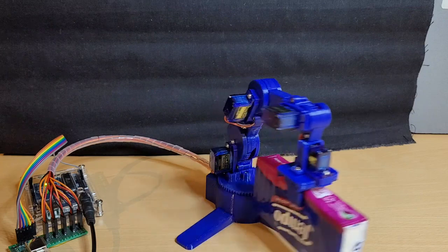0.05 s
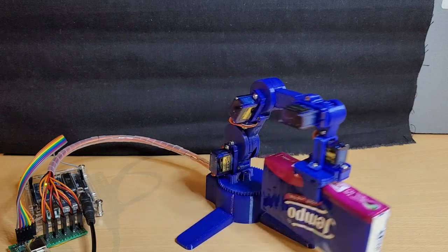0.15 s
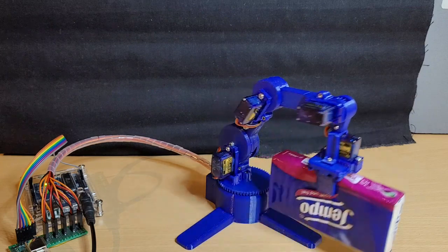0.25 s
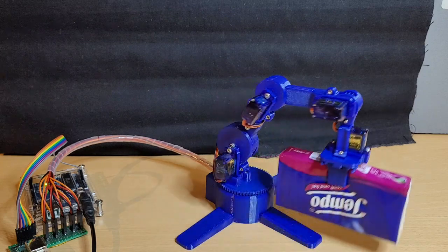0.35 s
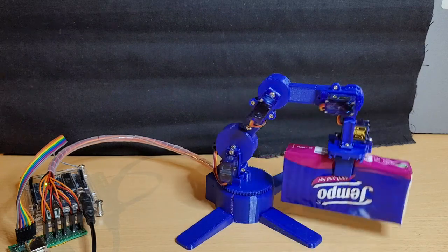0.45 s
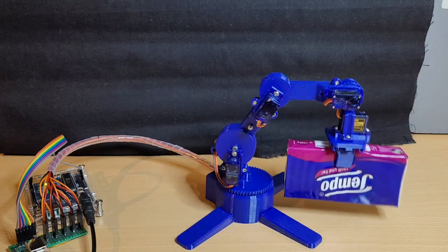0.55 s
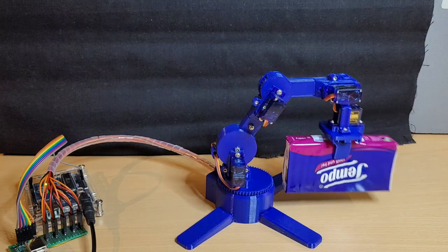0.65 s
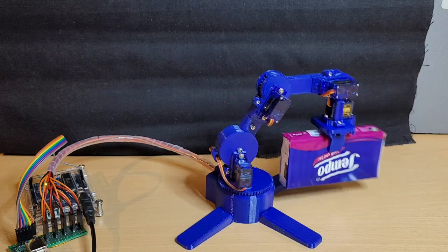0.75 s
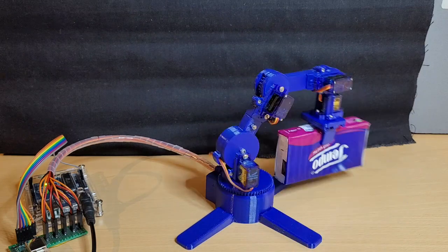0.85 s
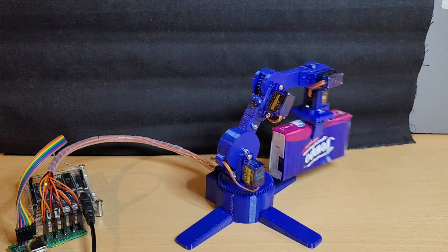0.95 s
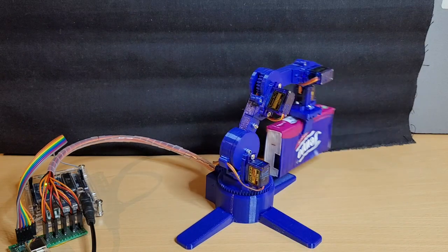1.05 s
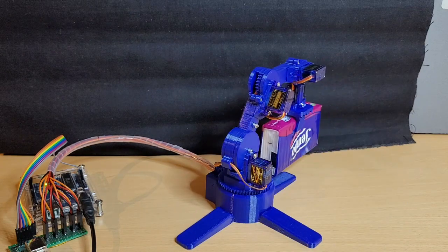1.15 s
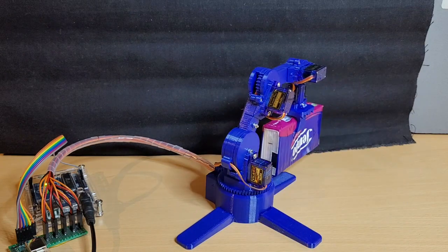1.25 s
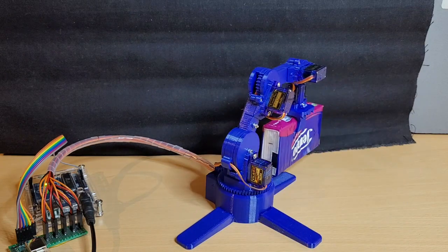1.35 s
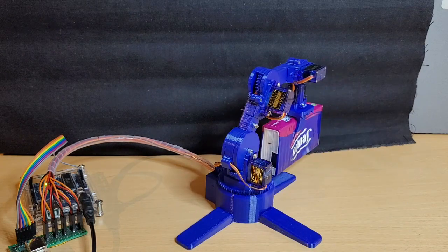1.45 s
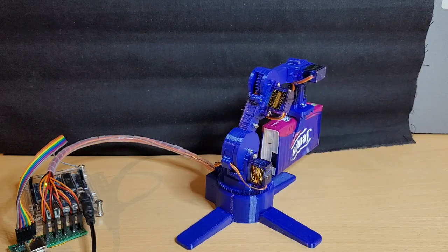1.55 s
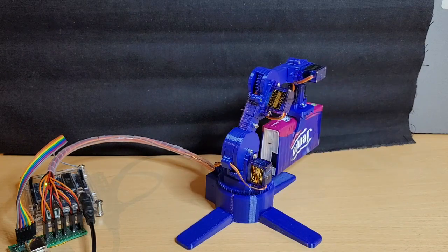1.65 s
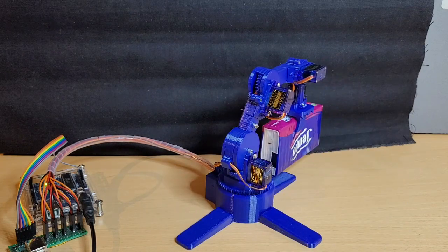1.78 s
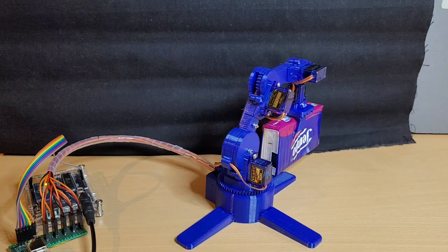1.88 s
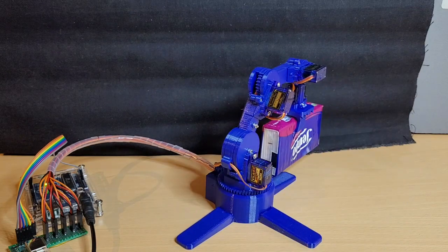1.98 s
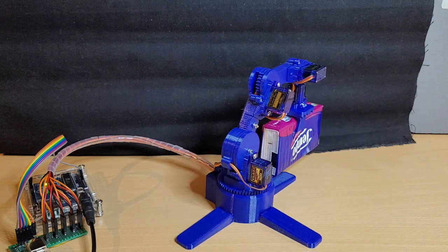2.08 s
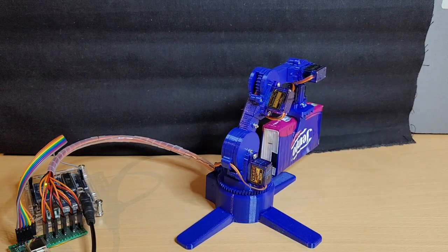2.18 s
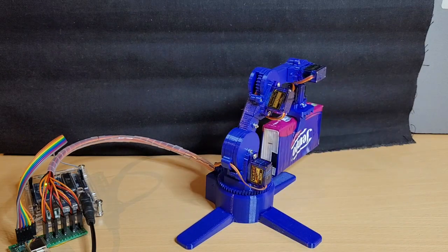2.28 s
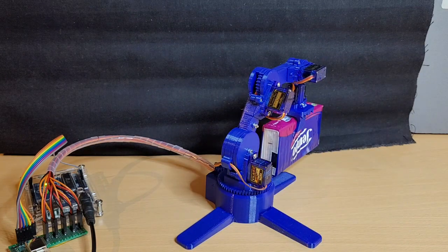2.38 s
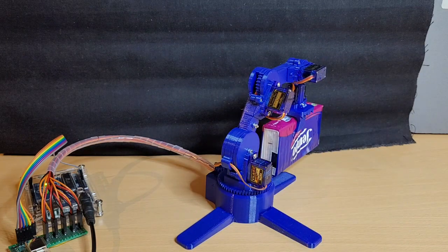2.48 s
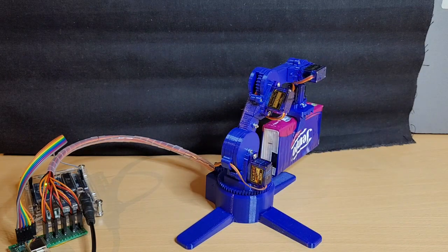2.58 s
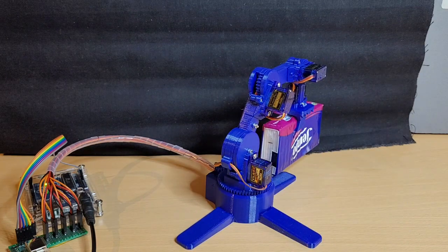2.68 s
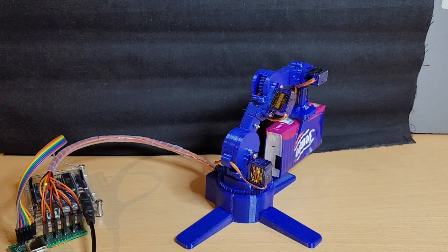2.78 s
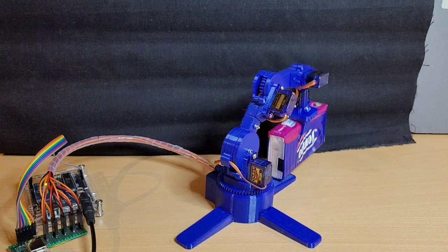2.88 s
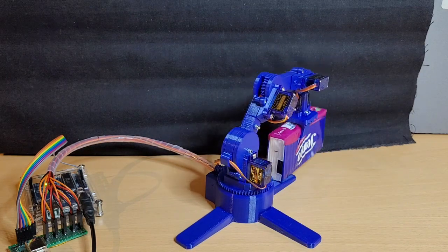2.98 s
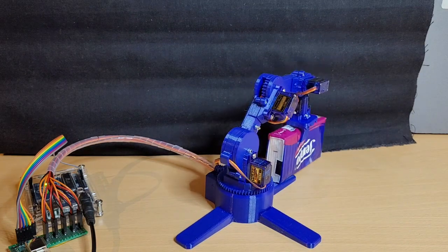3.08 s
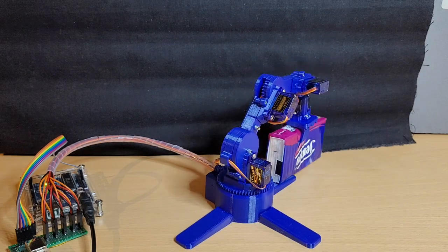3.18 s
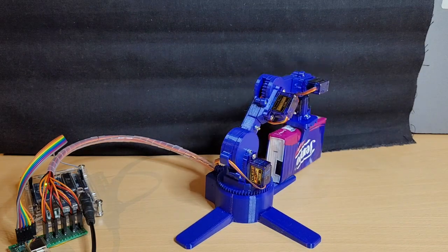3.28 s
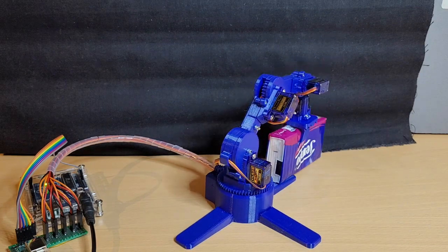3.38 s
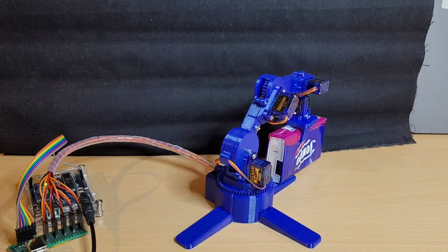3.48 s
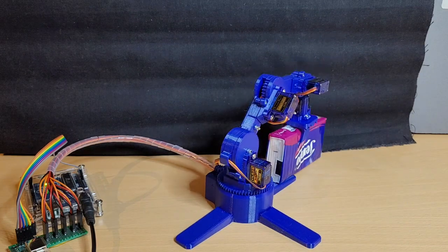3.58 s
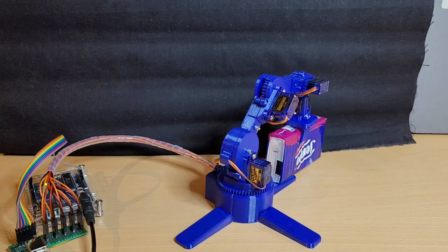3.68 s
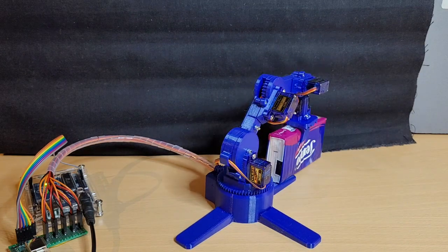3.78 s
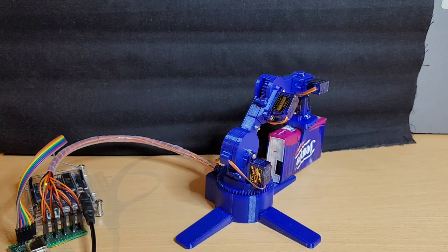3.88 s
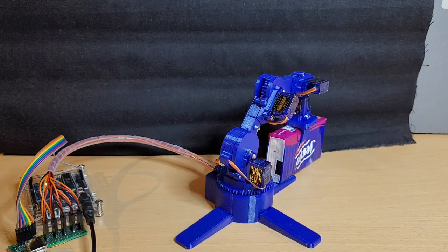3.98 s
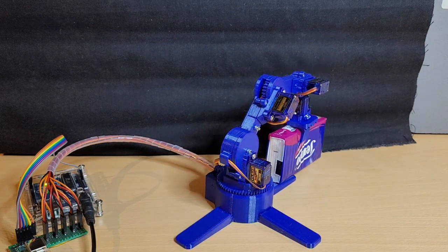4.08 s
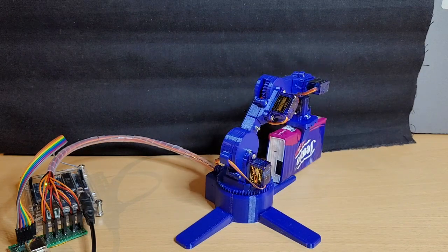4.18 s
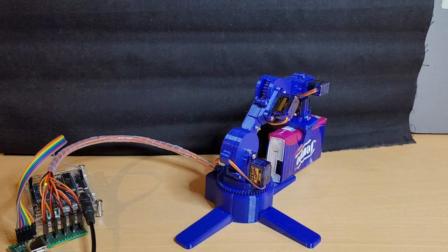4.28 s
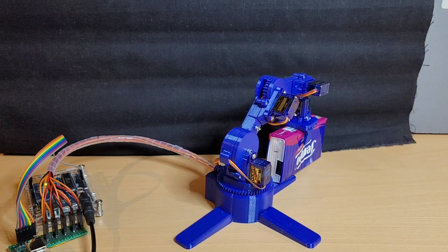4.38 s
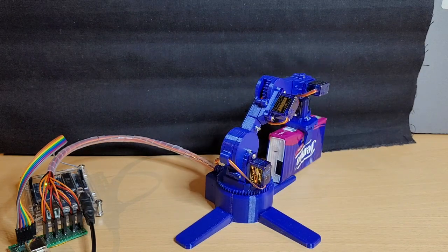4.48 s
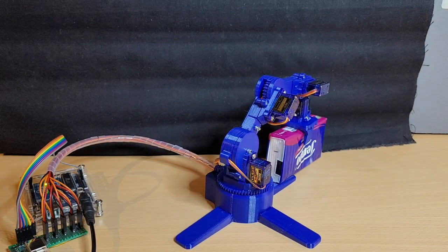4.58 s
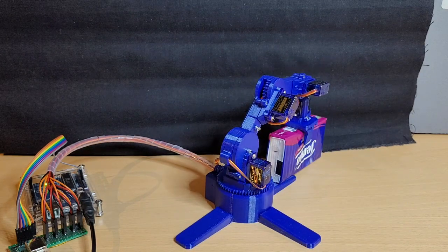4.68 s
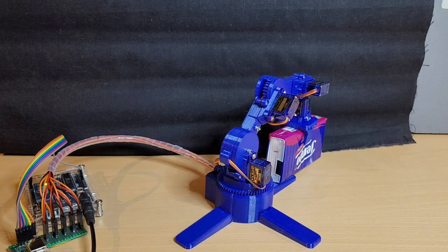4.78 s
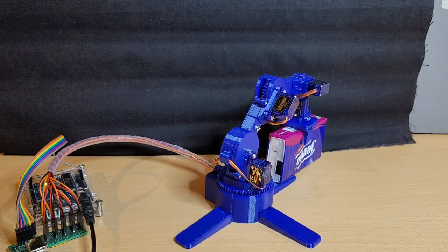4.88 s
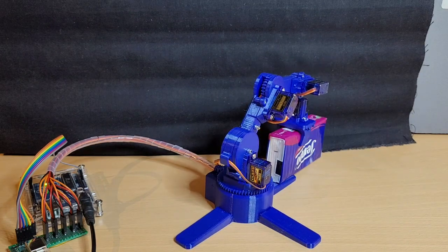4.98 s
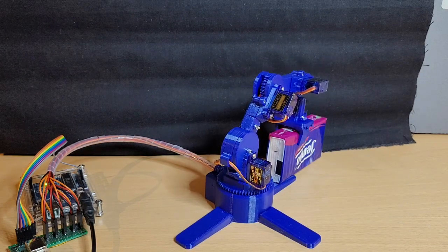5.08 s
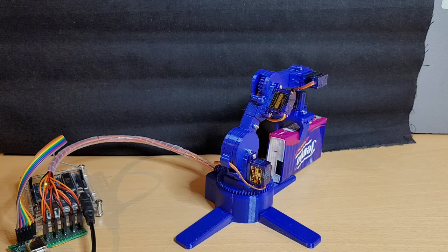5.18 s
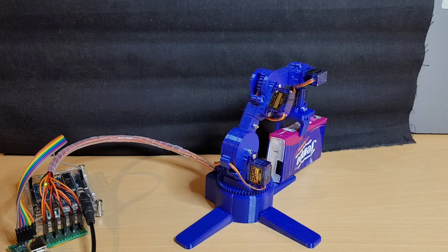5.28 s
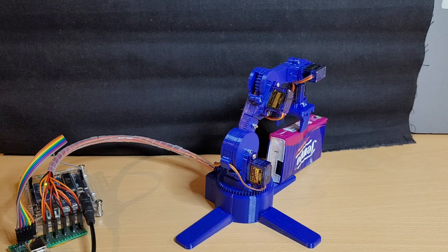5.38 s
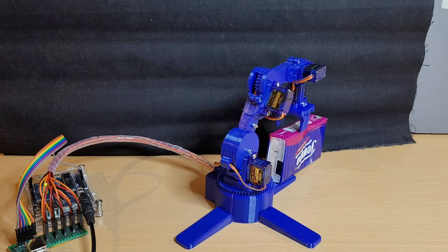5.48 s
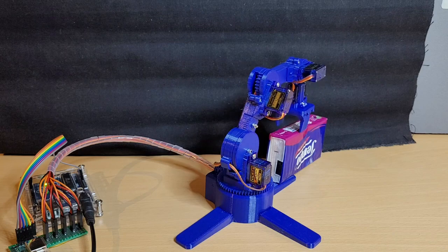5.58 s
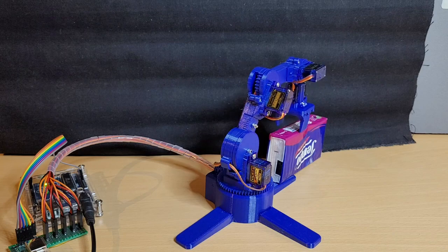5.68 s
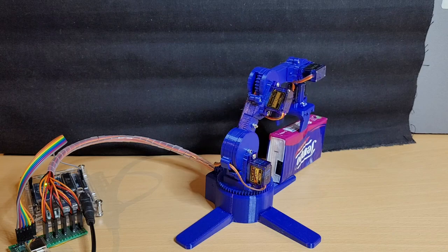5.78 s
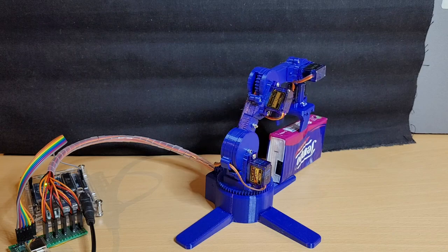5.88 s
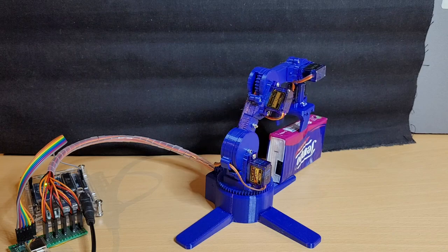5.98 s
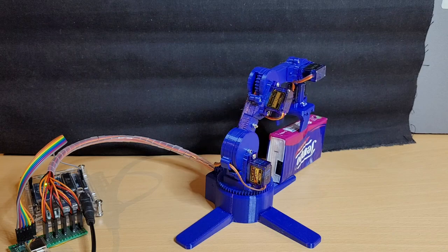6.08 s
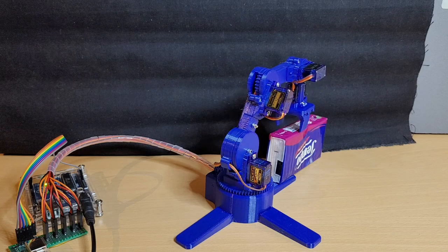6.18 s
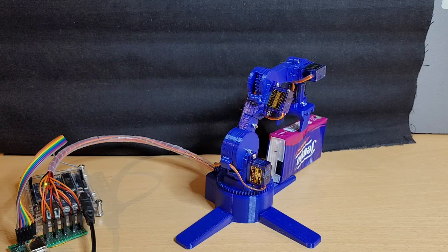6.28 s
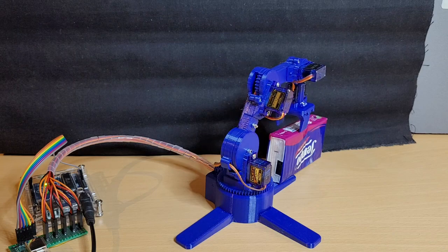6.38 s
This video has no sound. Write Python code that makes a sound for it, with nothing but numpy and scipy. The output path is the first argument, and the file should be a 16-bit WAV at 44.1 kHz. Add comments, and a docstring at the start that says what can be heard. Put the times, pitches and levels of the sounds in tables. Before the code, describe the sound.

A small plastic robot arm on a wooden table, heard very close. A servo whirrs with a nasal whine and broad, raspy gear rattle for just over a second, dropping in pitch as it stops. Then quiet hiss and a fast, regular ticking buzz as motors hold position, broken by short gritty gear twitches near three, four and five seconds. Small dry room, low table hum.

```python
"""A small plastic robot arm on a table: first the base servo finishes a long swing, whining and rattling its gears.
As it stops, switching edges start to knock and tick once per 20 ms control frame, while loaded motors hiss.
Joints then twitch in short surges of gear noise, mostly near 3, 4.2 and 5 s, and the carried load bumps softly.
Throughout, filtered noise and a low tone make the table top hum, over noise-tail reflections and quiet room tone;
a two-port microphone hears it close up."""
import sys
import numpy as np
from scipy import signal
from scipy.fft import rfft, irfft, next_fast_len
from scipy.io import wavfile
from scipy.ndimage import uniform_filter1d, map_coordinates

SR = 44100
rng = np.random.default_rng(int(sys.argv[2]) if len(sys.argv) > 2 else 0)


def pcm_store(signal):
    """Save signal as 16-bit PCM."""
    levels = np.round(np.clip(np.atleast_2d(signal), -1, 1) * 32767)
    wavfile.write(sys.argv[1], SR, levels.astype(np.int16).T)


N = 284445
FRAME_S = 1 / 50  # control frame of the servos

# room tone, spectrum: (f/Hz, gain/dB)
AIR_SPECTRUM = [(12, -69), (20, -34), (53, 8.5), (189, -27), (350, -11), (381, 1), (795, -11.5),
                (1030, -23.5), (1200, -14), (1560, -52), (2640, -120)]
AIR_DB = -88.5 + 3.0  # level of the quiet room tone, both parts together
# early reflections against direct sound: (f/Hz, level/dB)
REFLECTED = [(100, -15), (300, -7), (600, -7), (1100, -11), (2000, -11), (4000, -9)]
# microphone port colour: (f/Hz, left minus right/dB)
PORT_COLOUR = [(60, -1), (99, -5), (160, 1), (270, -3), (450, 0.5), (740, -3), (1220, 1.5), (2010, 0),
               (3330, 0.0), (5500, -2.0), (9080, 0.5), (15000, 4.5)]
TOP_HZ = 15830  # band limit of the microphone
# broad gear noise at the two ports: (f/Hz, likeness 0 to 1)
PORT_LIKENESS = [(60, 1), (300, 0.67), (640, 1), (1400, 0.53), (3100, 0.47), (6000, 0.2), (15000, 0.13)]

# pushes on the table top: (t/s, ring level/dB, rumble level/dB, deep shake level/dB, t60/s)
TABLE_PUSHES = [(.05, -61, -67, -70, 0.36), (.14, -57.5, -65, -68, 0.72), (.3, -59.5, -77, -67, 0.41),
                (.45, -65, -69, -61, .2), (.55, -54, -73, -72, 0.52), (.66, -55.5, -69, -69, 0.35),
                (.86, -59, -62, -82, 0.1), (1.03, -58.5, -78, -79, 0.22), (1.12, -55.5, -67, -63, 0.32),
                (1.26, -80, -93, -98, 1.1), (2.67, -86, -84, -79, 0.28), (2.76, -70, -78.5, -81, 1.5),
                (2.99, -73, -78, -70, 0.26), (3.08, -78, -79, -78, 0.12), (3.21, -84, -115, -101, 0.25),
                (4.27, -86, -67, -81, 0.16), (4.38, -75, -91, -97, 0.49), (4.895, -57, -72, -69, .2),
                (4.925, -60.5, -63, -70, 0.24), (5.16, -65.5, -64, -66, 0.56), (5.27, -67, -84, -82, 0.37),
                (5.35, -60.5, -70, -89, 0.32)]
PUSH_RISE_S = .03
SWING_RUMBLE_DB, SWING_SHAKE_DB = -64, -86
REST_RING_DB, REST_RUMBLE_DB, REST_SHAKE_DB = -93, -83, -89
# table rumble and the deep shake below it, spectra: (f/Hz, gain/dB)
RUMBLE_SPECTRUM = [(120, -30), (150, -5), (250, -0.5), (340, -1.5), (450, -12.5), (700, -12.5), (900, -38)]
SHAKE_SPECTRUM = [(15, -28), (30, -18), (60, -7.5), (95, -4), (125, -8), (170, -38)]

# hiss of the loaded motors, first level held from the start: (t/s, level/dB)
STRAIN_LEVEL = [(1.1, -46), (1.17, -60.5), (1.38, -65), (1.84, -63), (2.45, -65), (3.1, -59), (3.18, -67),
                (3.45, -69), (4.15, -64), (4.8, -69), (5.3, -56.5), (5.48, -65), (6.45, -62.5)]
# its spectrum: (f/Hz, gain/dB)
HISS_SPECTRUM = [(530, -41), (900, -29), (1010, -11.5), (1170, -4.5), (1390, -13.5), (1850, -7.5),
                 (2010, -4.5), (2380, -13.5), (3670, -6), (4190, -12), (6470, -8), (8420, -15.5),
                 (9270, -18.5), (11500, -14.5), (15900, -27.5)]

# bumps of the load in the grip: (t/s, level/dB)
LOAD_BUMPS = [(4.197, -42), (4.235, -56), (4.257, -59), (4.276, -43), (4.3, -51), (5.19, -50)]
# dull modes of the load: (f/Hz, width/Hz, level/dB)
LOAD_MODES = [(330, 180, -4), (624, 300, -2)]

# switching edges, one list per servo:
# (from t/s, to t/s, place in frame/ms, scatter/ms, strength level/dB, extra deep knock level/dB)
SERVO_EDGES = [
    [(1.2, 1.64, 2.05, .34, -41.5, -4), (1.64, 1.73, 2.36, .36, -34.5, -8),
     (1.73, 3.207, 4.1, .59, -54, -24), (3.25, 3.45, 2.39, .03, -49, 8),
     (3.45, 4.19, 2.42, .014, -42.5, 9.5), (4.199, 4.797, 2.87, .018, -41, -4.5),
     (4.797, 6.45, 2.98, .047, -40, 0)],
    [(1.624, 1.724, 9.1, .34, -33, -14), (1.724, 2.15, 7.9, .09, -37, -2),
     (2.15, 3.197, 6.84, .057, -40, 6)],
    [(1.29, 1.622, 10.5, .07, -51, 5), (3.197, 3.4, 10.4, .035, -48.5, 4), (3.4, 4.21, 10.4, .02, -44, -17),
     (4.21, 6.45, 11.14, .03, -42.5, -12)],
    [(3.204, 4.15, 6.26, .03, -55, -1), (4.35, 6.45, 10, .011, -41.5, -15),
     (5.813, 6.45, 18.2, .03, -45, -37)],
]
# voice of each servo: (level/dB of four housing parts, tick level/dB)
SERVO_VOICES = [(-10.5, -4, -2.5, -3, -16.5), (-19.5, -7, -0.5, -4.5, -18.5), (-10, -1, 1, -4.5, -22.5),
                (8, -19, -31, -5, -14)]
# each servo's edge comes early and late in turn, by: (offset/ms)
EDGE_DITHER = [0.018, .12, 0.013, 0.018]
# how far the extra deep knock reaches each housing part: (share of its dB)
DEEP_SHARE = [1, .4, 0.3, 0]
# modes of four housing parts: (f/Hz, width/Hz, level/dB)
HOUSING_MODES = [
    [(945, 35, -12.5), (670, 21, -22), (1061, 21.5, 3.5)],
    [(1143, 60, 0), (1199, 65, 2)],
    [(2025, 85, -11)],
    [(2655, 700, -3.5), (3260, 93, 3.5), (3500, 84, -2.5), (3737, 65, 6)],
]
# gear modes, a dull and a bright list: (f/Hz, width/Hz, level/dB)
GEAR_MODES = [
    [(3646, 1740, 0.5), (4700, 1850, 3.5), (6410, 770, 6.5), (8490, 460, -1.5)],
    [(9800, 100, -2), (11470, 370, -3.5), (13300, 490, -1.5), (13200, 9300, -21)],
]

# short joint moves, a surge per frame: (first surge t/s, frames to the snapped surge, frames to the last)
JOINT_MOVES = [(1.1144, 0, 0), (2.322, 0, 0), (2.6424, 1, 3), (2.7207, 0, 2), (2.781, 1, 2), (2.841, 1, 2),
               (2.901, 0, 1), (2.943, 2, 3), (3.021, 0, 1), (3.059, 2, 3), (4.19, 1, 1), (4.229, 0, 0),
               (4.245, 1, 1), (4.278, 0, 2), (4.8, 3, 8), (5.059, 1, 3), (5.14, 2, 5), (5.305, 1, 2)]
# their force: (first level/dB, level of the snapped surge/dB, last level/dB, brightness/dB, arm shudder level/dB)
MOVE_FORCE = [(-50, -46, -50, -10, -90), (-62, -60, -62, -8, -90), (-44.5, -47, -45.5, -4, -65),
              (-38, -39, -76, -8, -60), (-58, -59, -54.5, 2, -82), (-48, -49.5, -56, 0.5, -70),
              (-52, -49.5, -68, 4.5, -76), (-46.5, -51, -68, 1, -75), (-58, -56, -57, -1, -71),
              (-48, -53, -53, 2.5, -73), (-64, -59.5, -64, -1, -66), (-54, -53.5, -54, -4, -61),
              (-62, -57, -60, -3, -69), (-51, -53, -63, -6, -58.5), (-51, -38.5, -51, 1.5, -55.5),
              (-43.5, -38, -46, -1, -55), (-52, -47, -55, -4, -71), (-45, -41.5, -47.5, -4.5, -57.5)]
SURGE_RISE_S, SURGE_S = 0.0037, 0.016
COAST_S, COAST_DB = 0.022, -12.5  # the gears run on after a surge
SNAP_S, SNAP_DB = 0.0021, 1.5  # slack is taken up with a snap at one chosen surge of each move
DULLING_DB = 1  # treble lost per frame of a move
# shudder of the arm, spectrum: (f/Hz, gain/dB)
SHUDDER_SPECTRUM = [(250, -41), (350, -7), (700, -8), (1150, 10), (1450, 2), (1750, 9.5), (2100, 8),
                    (2600, -54), (3500, -57)]

# gear teeth in the long swing: (t/s, level/dB)
SWING_TEETH = [(0, -42.5), (.16, -40), (.26, -46), (.37, -46.5), (.48, -43), (.58, -40), (.68, -41),
               (.8, -45), (1.09, -43), (1.126, -33.5), (1.166, -63), (1.23, -77)]
HOUSING_DB = -48.5  # mean level of the housing rattle
# housing rattle and tooth rattle, spectra: (f/Hz, gain/dB)
HOUSING_SPECTRUM = [(290, -21.5), (500, -4.5), (567, -15), (619, -13), (736, -18), (816, -13.5), (876, -6),
                    (986, -12.5), (1160, -6), (1450, -7.5), (2050, 2.5), (2460, -10), (3300, -22),
                    (4290, -58), (7260, -120)]
TEETH_SPECTRUM = [(1470, -22.5), (2500, -2), (4100, -20), (4460, -11), (5390, 2.5), (6370, -0.5), (7420, 3),
                  (8970, -4.5), (9390, -1), (10500, -4), (11500, 1), (13300, -5), (15400, -7.5)]
WHISTLE_S, WHISTLE_WIDE_S, WHISTLE_DB = 0.59, 0.28, -51  # the pinion whistle swells and fades
STOP_S, STOP_FADE_S = 1.127, .01  # the swing ends

# swinging motor: (t/s, shaft f/Hz, shaft tone level/dB)
MOTOR_SHAFT = [(0, 413.8, -50.5), (.146, 413, -49), (.23, 416.6, -59), (.28, 462.4, -60),
               (.374, 461.4, -49.5), (.53, 458.6, -48.5), (.62, 451.5, -59.5), (.71, 435.3, -63),
               (.77, 439.8, -56), (.88, 448.2, -56.5), (.92, 405.6, -53.5), (1.04, 338.2, -49.5),
               (1.08, 309, -56), (1.115, 282, -61), (1.18, 272, -70)]
# its 2nd, 3rd and 5th order, before the case: (level/dB)
ORDER_LEVELS = [-66, -61.5, -56.5]
# what the case lets out of the orders: (f/Hz, gain/dB)
CASE_GAIN = [(500, -18), (850, -6.5), (1000, 2), (1150, 14), (1250, 5.5), (1385, 3.5), (1440, -14),
             (1800, 3), (2070, 4), (2230, 6.5), (2320, -3)]
FLARE_S, FLARE_WIDE_S, FLARE_DB = .85, .045, 25  # the 2nd order flares once before the motor slows


def amp(db):
    """Decibels to amplitude."""
    return 10 ** (np.asarray(db) / 20)


def unit(x):
    """x at rms 1."""
    return x / np.sqrt(np.mean(x ** 2) + 1e-20)


def along(points, hz):
    """(f/Hz, value) points read on a log frequency axis."""
    f, v = np.transpose(points)
    return np.interp(np.log(hz + 1), np.log(f + 1), v)


def curves(rows):
    """One value per sample for each column after the time."""
    s, *cols = np.transpose(rows)
    return [np.interp(np.arange(N) / SR, s, c) for c in cols]


def during(rows):
    """1 inside the time span of a table, 0 outside, with soft edges."""
    t = np.arange(N) / SR
    return uniform_filter1d(1. * (t >= rows[0][0]) * (t <= rows[-1][0]), size=400)


def bump(at, wide):
    """A bell-shaped swell of height 1."""
    return np.exp(-.5 * ((np.arange(N) / SR - at) / wide) ** 2)


def running():
    """1 while the swing lasts, fading as it stops."""
    return 1 / (1 + np.exp(np.clip((np.arange(N) / SR - STOP_S) / STOP_FADE_S, -50, 50)))


def wobble(rate):
    """A smooth random curve, rate knots a second."""
    knots = rng.standard_normal(int(N * rate / SR) + 4)
    return map_coordinates(knots, [np.arange(N) * rate / SR])


def filtered(x, response):
    """x through a complex response of frequency."""
    m = next_fast_len(N + SR // 2)
    return irfft(rfft(x, m) * response(np.fft.rfftfreq(m, 1 / SR)), m)[..., :N]


def coloured(x, spectrum):
    """x shaped by a (f/Hz, gain/dB) spectrum, rms 1."""
    return unit(filtered(x, lambda hz: amp(along(spectrum, hz))))


def rung(x, modes):
    """x through causal resonances of alternating sign; white noise keeps its level."""
    def shape(f):
        total = 0
        for k, (centre, width, db) in enumerate(modes):
            damping = 1j * f * width
            total = total + (-1) ** k * amp(db) * damping / (centre ** 2 - f * f + damping)
        return total
    size = np.sqrt(np.mean(np.abs(shape(np.linspace(1, SR / 2, num=4000))) ** 2))
    return filtered(x, shape) / size


def band(x, hz, width_hz):
    """A narrow band made from x, carried along a moving centre."""
    slow = filtered(x, lambda f: 1 / (1 + 1j * f / width_hz) ** 2)
    return unit(slow * np.sin(2 * np.pi * np.cumsum(hz + np.zeros(N)) / SR))


def spread(rows, patchy_db=2.5):
    """Noise from a source larger than the port spacing, less alike in the treble; its colour drifts in patches."""
    shared, own = rng.standard_normal(rows), rng.standard_normal((2, rows))
    alike = np.clip(along(PORT_LIKENESS, np.fft.rfftfreq(rows, 1 / SR)), 0, 1)
    noise = irfft(np.sqrt(alike) * rfft(shared) + np.sqrt(1 - alike) * rfft(own), rows)
    z = signal.stft(noise, nperseg=512)[2]
    field = uniform_filter1d(rng.standard_normal(z.shape[1:]), size=4, axis=0)
    field = uniform_filter1d(field, size=8, axis=1)
    return unit(signal.istft(z * amp(patchy_db * unit(field)), nperseg=512)[1][:, :rows])


def rattle(uneven_db, clump_db, drive_db):
    """Tooth contacts as noise of uneven, clumped force, swelling (or dipping, below 0 dB) early in each frame."""
    force = amp(uneven_db * rng.standard_normal(N) + clump_db * wobble(500))
    drive = amp(drive_db * np.cos(2 * np.pi * (np.arange(N) / SR - .006) / FRAME_S))
    return unit(spread(N) * force * drive)


def room_tone():
    """Quiet low noise of the room, partly shared by the two ports."""
    common, own = rng.standard_normal(N), rng.standard_normal((2, N))
    return amp(AIR_DB) * coloured(common + 2.0 * own, AIR_SPECTRUM)


def walls(x):
    """The diffuse answer of the walls: a decaying noise tail, 0.23 s to -60 dB."""
    t = np.arange(SR // 4) / SR
    tail = rng.standard_normal((2, len(t))) * amp(-60 * t / 0.23) * (t > .004)
    return signal.fftconvolve(x, tail / np.linalg.norm(tail[0]), axes=1)[:, :N]


def nearby(x, hop_s):
    """Table and arm reflect a compact source within milliseconds; the paths shift every hop_s, port by port."""
    hop, t = round(hop_s * SR), np.arange(SR // 20) / SR
    echo, padded = np.zeros((2, N + 3 * hop + len(t))), np.pad(x, (hop, 2 * hop))
    window = np.sin(np.pi * np.arange(2 * hop) / (2 * hop))
    for at in range(0, N + hop, hop):
        tail = rng.standard_normal((2, len(t))) * amp(-60 * t / 0.011)
        tail /= np.linalg.norm(tail[0])
        piece = padded[at:at + 2 * hop] * window
        echo[:, at:][:, :2 * hop + len(t) - 1] += signal.fftconvolve(piece[None], tail, axes=1)

    def share(hz):
        return amp(along(REFLECTED, hz))
    direct = filtered(x, lambda hz: 1 / np.sqrt(1 + share(hz) ** 2))
    reflected = filtered(echo[:, hop:hop + N], lambda hz: share(hz) / np.sqrt(1 + share(hz) ** 2))
    return direct + reflected


def table():
    """Moves shake the table top: one low mode, a rumble above it and a deep shake below."""
    t = np.arange(N) / SR
    levels = amp([[REST_RING_DB], [REST_RUMBLE_DB], [REST_SHAKE_DB]]) + np.zeros(N)
    levels[1:] += amp([[SWING_RUMBLE_DB], [SWING_SHAKE_DB]]) * running()
    for s, *db, t60 in TABLE_PUSHES:
        decay = amp(-60 * np.maximum(t - s, 0) / t60)
        levels += amp(db)[:, None] * np.where(t < s, bump(s, PUSH_RISE_S), decay)
    ring = np.sqrt(2) * np.sin(2 * np.pi * np.cumsum(128.5 + 3 * wobble(12)) / SR)
    rumble = levels[1] * coloured(spread(N), RUMBLE_SPECTRUM)
    shake = levels[2] * coloured(spread(N), SHAKE_SPECTRUM)
    return levels[0] * amp(1.5 * wobble(25)) * ring, rumble + shake


def strain():
    """The loaded motors hiss: clumped noise through a fixed colour."""
    level_db, = curves(STRAIN_LEVEL)
    return amp(level_db) * coloured(rattle(uneven_db=1.0, clump_db=2.0, drive_db=0.5), HISS_SPECTRUM)


def thuds():
    """Soft bumps of the carried load: impulses ring its dull modes."""
    blows = np.zeros(N)
    for s, db in LOAD_BUMPS:
        blows[round(s * SR)] = amp(db)
    return rung(blows, LOAD_MODES)


def knocks_and_ticks():
    """Each switching edge knocks the housing, alike from frame to frame, and ticks the gears, never twice alike."""
    knocks, jabs = np.zeros((len(HOUSING_MODES), N + SR)), np.zeros(N + SR)
    frames = np.arange(int(N / SR / FRAME_S)) * FRAME_S
    turns = (-1) ** np.arange(len(frames))
    for rows, (*knock_db, tick_db), dither_ms in zip(SERVO_EDGES, SERVO_VOICES, EDGE_DITHER):
        for start, end, ms, scatter_ms, db, deep_db in rows:
            late, strong, sharp = rng.standard_normal((len(frames), 3)).T
            on = (frames >= start) & (frames < end)
            place_ms = ms + dither_ms * turns + scatter_ms * late
            at = np.round((frames + place_ms / 1000) * SR).astype(int)[on]
            parts_db = np.array(knock_db) + deep_db * np.array(DEEP_SHARE)
            knocks[:, at] += amp(parts_db[:, None] + db + 1.74 * strong[on])
            jabs[at] += amp(tick_db + db + 2.1 * sharp[on])
    tick_decay = amp(-60 * np.arange(SR // 100) / SR / .005)
    chatter = signal.fftconvolve(jabs, tick_decay)[:N] * spread(N)
    housing = sum(rung(k[:N], modes) for k, modes in zip(knocks, HOUSING_MODES))
    return housing, rung(chatter, sum(GEAR_MODES, []))


def twitches():
    """Brief moves: each surge swells and dies in about a frame, and the gears coast on between surges."""
    dull, bright, shudder = np.zeros((3, N + SR))
    t = np.arange(SR // 5) / SR
    swell = 1 - np.exp(-t / SURGE_RISE_S)
    coast = swell * np.exp(-t / COAST_S)
    surge = swell / (1 + (t / SURGE_S) ** 4) + amp(COAST_DB) * coast
    for (first, snapped, frames), force in zip(JOINT_MOVES, MOVE_FORCE):
        first_db, snapped_db, last_db, bright_db, shudder_db = force
        snap = amp(snapped_db + bright_db + SNAP_DB) * np.exp(-t / SNAP_S)
        bright[round((first + snapped * FRAME_S) * SR):][:len(t)] += snap
        for k in range(frames + 1):
            at = round((first + k * FRAME_S) * SR)
            path_db = np.interp(k, [0, snapped, frames], [first_db, snapped_db, last_db])
            db = snapped_db if k == snapped else path_db
            dull[at:][:len(t)] += amp(db) * surge
            bright[at:][:len(t)] += amp(db + bright_db - DULLING_DB * k) * surge
            shudder[at:][:len(t)] += amp(db - snapped_db + shudder_db) * coast
    teeth = rattle(uneven_db=4.5, clump_db=1.5, drive_db=-0.5)
    gears = rung(dull[:N] * teeth, GEAR_MODES[0]) + rung(bright[:N] * teeth, GEAR_MODES[1])
    return gears + shudder[:N] * coloured(teeth, SHUDDER_SPECTRUM)


def swing():
    """The gear train rattles broadly through housing and teeth, with a thin pinion whistle."""
    teeth_db, = curves(SWING_TEETH)
    teeth = rattle(uneven_db=3.5, clump_db=0.0, drive_db=1.0)
    housing = amp(HOUSING_DB + 0.6 * wobble(14.9)) * running() * coloured(teeth, HOUSING_SPECTRUM)
    clatter = amp(teeth_db) * coloured(teeth, TEETH_SPECTRUM)
    whistle = amp(WHISTLE_DB) * bump(WHISTLE_S, WHISTLE_WIDE_S) * band(teeth, 9430, width_hz=240)
    return (housing + clatter + whistle) * during(SWING_TEETH)


def motor():
    """The swinging motor: a nearly clean shaft tone; each upper order is a line in a smear that widens with it."""
    hz, shaft_db = curves(MOTOR_SHAFT)
    turn = 2 * np.pi * np.cumsum(hz * (1 + .01 * wobble(80))) / SR
    out = amp(shaft_db + 2.4 * wobble(60.5)) * np.sqrt(2) * np.sin(turn)
    smear_hz, line_share = 14, .6  # smear width per order, power share of the line
    flare_db = [FLARE_DB * bump(FLARE_S, FLARE_WIDE_S), 0, 0]
    for k, db, more_db in zip([2, 3, 5], ORDER_LEVELS, flare_db):
        smear = band(rng.standard_normal(N), k * hz, k * smear_hz)
        line = np.sqrt(2) * np.sin(k * turn)
        gain = amp(db + more_db + along(CASE_GAIN, k * hz) + 1.2 * wobble(20.2)) * running()
        out = out + gain * (np.sqrt(line_share) * line + np.sqrt(1 - line_share) * smear)
    return during(MOTOR_SHAFT) * out


def scene():
    """Compact sources get early reflections, broad ones do not; the walls answer both over the room tone."""
    (knocks, ticks), (ring, rumble) = knocks_and_ticks(), table()
    compact = nearby(motor() + thuds() + knocks + ring, hop_s=0.427)
    broad = swing() + twitches() + ticks + strain() + rumble
    arm = compact + broad
    return arm + amp(-9.5) * walls(arm) + room_tone()


def record(dry):
    """The ports differ in colour, the left one hears 30 microseconds earlier, and nothing passes the band limit."""
    side = np.array([[.5], [-.5]])

    def ports(hz):
        lead = np.exp(2j * np.pi * hz * side * .00003)
        return amp(side * along(PORT_COLOUR, hz)) * lead * (hz < TOP_HZ)
    return filtered(dry, ports)


dry = scene()
out = record(dry)
pcm_store(out)
```